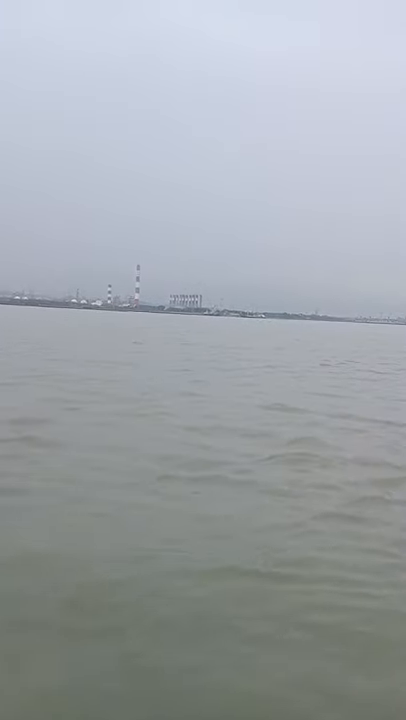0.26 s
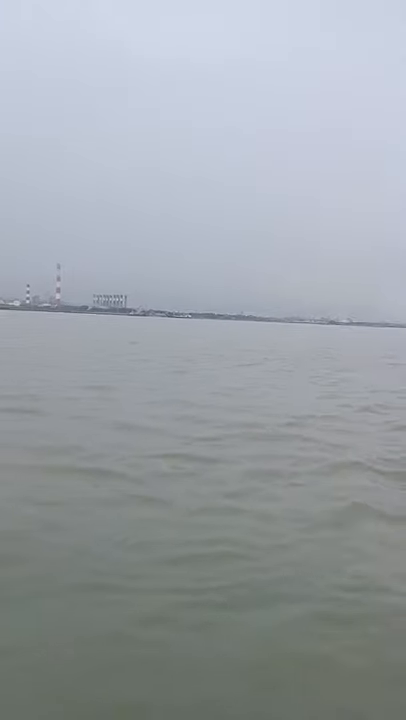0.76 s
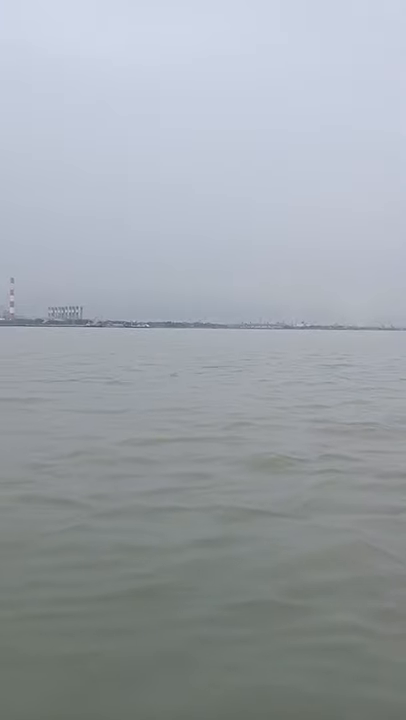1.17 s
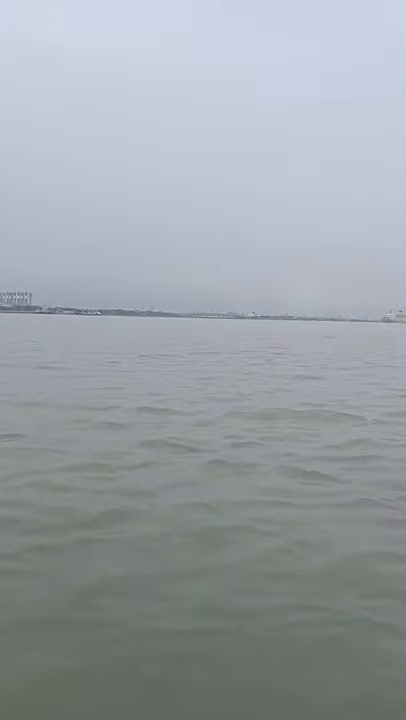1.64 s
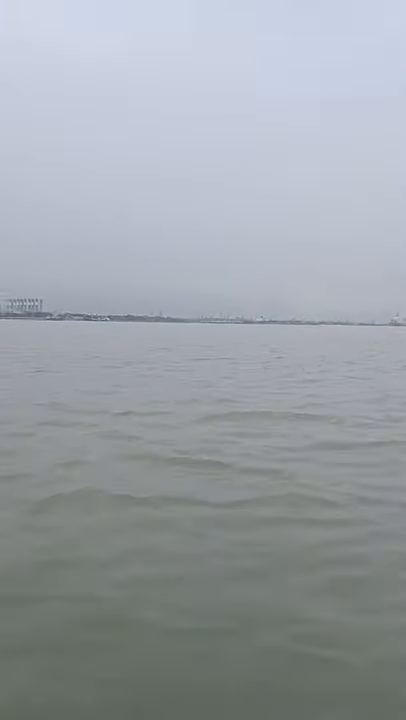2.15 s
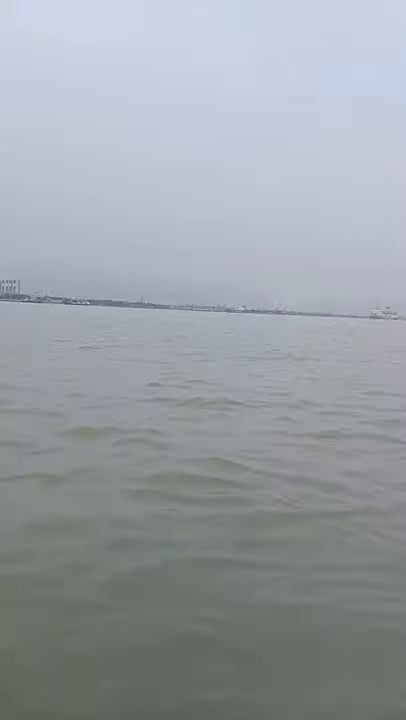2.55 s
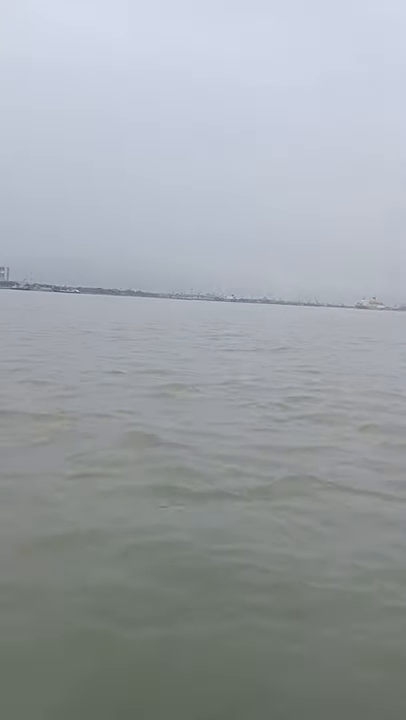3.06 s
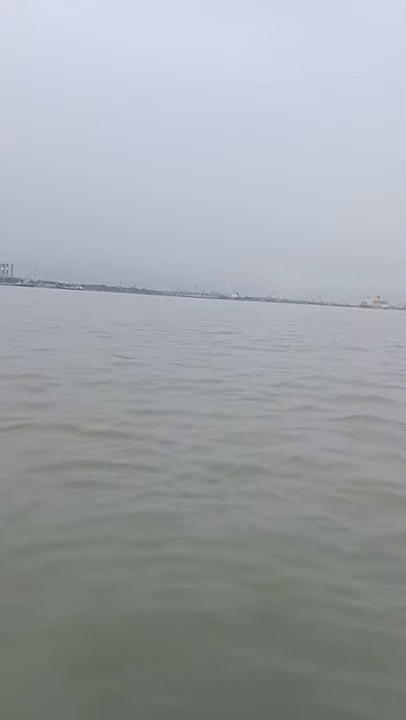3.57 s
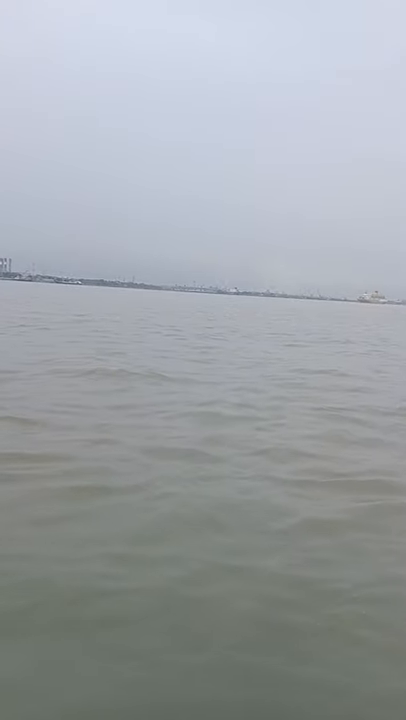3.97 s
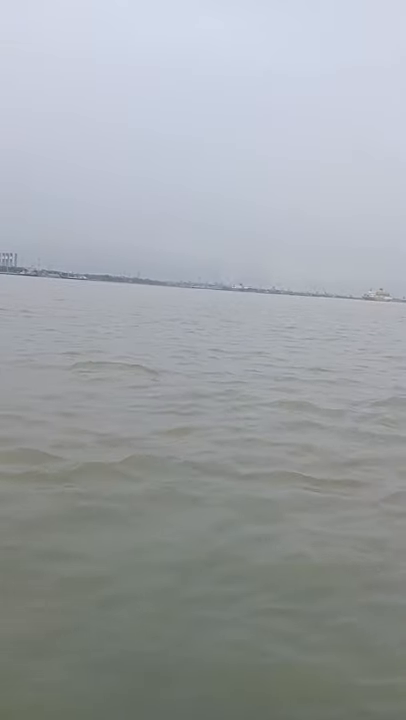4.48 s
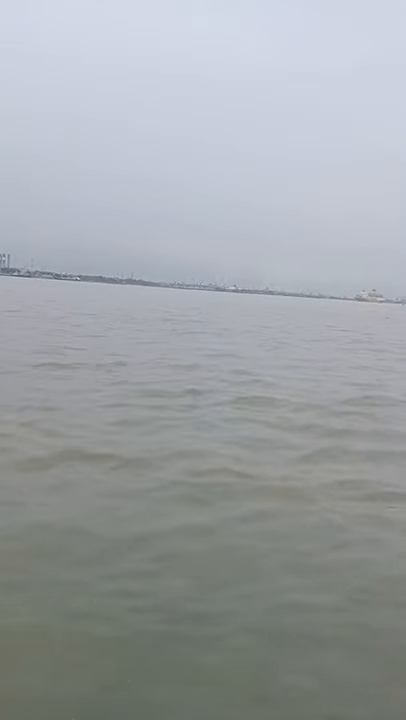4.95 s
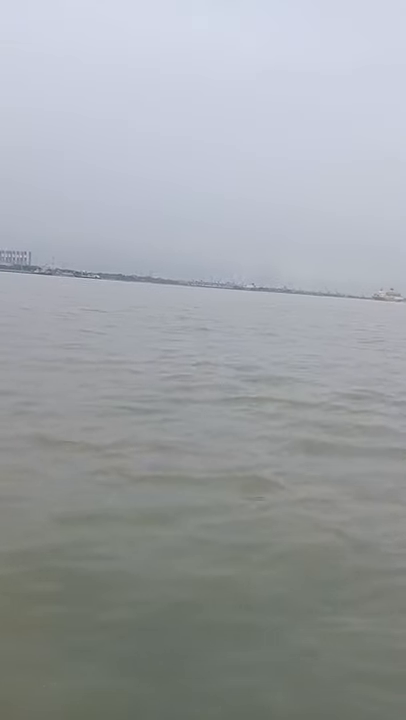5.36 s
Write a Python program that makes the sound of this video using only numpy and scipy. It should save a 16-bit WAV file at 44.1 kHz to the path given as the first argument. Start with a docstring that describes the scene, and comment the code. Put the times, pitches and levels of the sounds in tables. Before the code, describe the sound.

Deep, slowly pulsing boat engines drone on deck under constant clatter, an unsteady ringing tone and a soft hiss of water.

```python
"""A deep, slowly beating throb fills the deck of a river boat under way. It comes from a slow main
diesel and a fast generator diesel: their periodic exhaust puffs form two harmonic series, and
neighbouring harmonics beat. Engines and propeller force the hull to rumble, and impacts make the
casings clatter and the valves knock. Friction sets the propeller shaft singing unsteadily.
Behind these, gears whine, an air intake rushes and water hisses along the hull."""
import sys
import numpy as np
from scipy import signal
from scipy.fft import rfft, irfft, next_fast_len
from scipy.io import wavfile

SR = 44100
rng = np.random.default_rng(int(sys.argv[2]) if len(sys.argv) > 2 else 0)


def master_out(mix):
    """Clip the mix to full scale and print it as 16-bit PCM to the path in sys.argv[1]."""
    frames = np.transpose(np.atleast_2d(mix))
    ceiling = np.clip(frames, -1, 1)
    pcm = np.round(ceiling * 32767).astype(np.int16)
    wavfile.write(sys.argv[1], SR, pcm)


N = 247842
TIME = np.arange(N) / SR


def from_db(db):
    """Amplitude ratio of a level in decibels."""
    return 10 ** (np.asarray(db) / 20)


def unit_rms(x):
    """Normalisation to unit mean power."""
    return x / np.sqrt(np.mean(np.abs(x) ** 2) + 1e-20)


def in_time(rows):
    """Linear interpolation of (t, value) rows at every sample."""
    return np.interp(TIME, *np.transpose(rows))


def coloured(x, spectrum):
    """Spectral shaping by (f, level) rows, falling 20 dB per octave beyond their ends; rms 1."""
    hz, db = np.transpose(spectrum)
    size = next_fast_len(N)
    bins = np.maximum(np.arange(size // 2 + 1) * SR / size, 1)
    octaves_outside = np.abs(np.log2(bins / np.clip(bins, hz[0], hz[-1])))
    gain = from_db(np.interp(np.log(bins), np.log(hz), db) - 20 * octaves_outside)
    return unit_rms(irfft(rfft(x, size) * gain, size)[:N])


def noise(spectrum):
    """Filtered Gaussian noise; rms 1."""
    return coloured(rng.standard_normal(N), spectrum)


def drift(corner_hz):
    """Slow random fluctuation: low-passed noise of rms 1."""
    step, settle = 40, 2000
    pole = np.exp(-2 * np.pi * corner_hz * step / SR)
    white = rng.standard_normal(N // step + settle + 2)
    slow = signal.lfilter([1], [1, -2 * pole, pole * pole], white)[settle:]
    return np.interp(np.arange(N) / step, np.arange(len(slow)), unit_rms(slow))


def cyclic_noise(cycles):
    """Periodic excitation: one random pattern repeats on each engine cycle."""
    size = int(N / (cycles[-1] - cycles[0]))
    return rng.standard_normal(size)[(cycles % 1 * size).astype(int) % size]


def swell(start, length, edge_s):
    """Envelope from 0 to 1 with sinusoidal edges, at half height at the start and the end."""
    inside = np.minimum(TIME - start, start + length - TIME)
    return .5 + .5 * np.sin(np.pi / 2 * np.clip(inside / edge_s, -1, 1))


# Strength of the water's hiss: t/s, level/dB
WATER_LEVEL = [(0.0, -47.5), (.25, -47), (.65, -48.2), (1.15, -47.5), (1.45, -49), (2.0, -48.5), (2.7, -49),
               (4.0, -49.5), (5.6, -48.5)]
# Its spectrum: f/Hz, relative level/dB
WATER_SPECTRUM = [(2000, -8), (4200, 4.5), (4900, 0), (5600, -1), (6400, -12), (7200, -8.5), (7650, -9),
                  (8250, -7), (10000, -20), (12200, -24.5), (13600, -16.5), (15500, -22.5)]
def water_hiss():
    """Flow noise: water running along the hull radiates a broad band of treble."""
    return from_db(in_time(WATER_LEVEL)) * noise(WATER_SPECTRUM)


# Swells of the intake: onset t/s, duration/s, level/dB above the steady rush
INTAKE_SWELLS = [(2.09, 0.09, 4.5), (2.397, 0.18, 3), (3.28, .16, 2), (3.96, 0.12, 3.5), (5.36, 0.13, 6)]
# Its spectrum: f/Hz, relative level/dB
INTAKE_SPECTRUM = [(3000, -27.5), (3480, -6.5), (3620, 2.5), (3710, -0.5), (3820, -12), (4100, -31),
                   (5000, -58.5)]
def air_intake(steady_db, edge_s, waver_db):
    """Narrow-band flow noise: the rush of indrawn air wavers and now and then swells."""
    swells_db = sum(db * swell(start, length, edge_s) for start, length, db in INTAKE_SWELLS)
    return from_db(steady_db + swells_db + waver_db * drift(7.4)) * noise(INTAKE_SPECTRUM)


def whine(hz, wander, flutter_db):
    """A tone under slight random frequency and amplitude modulation; rms 1."""
    turns = np.cumsum(hz * (1 + wander * drift(1.87))) / SR + rng.random()
    return unit_rms(np.sin(2 * np.pi * turns) * from_db(flutter_db * drift(7.7)))


# Gear mesh tone, louder under load: t/s, level/dB
MESH_LEVEL = [(0.0, -39), (.45, -40.5), (.72, -33.5), (1.15, -36), (1.6, -30), (2.2, -37.5), (2.7, -34),
              (3.55, -36), (3.9, -29), (4.25, -38.5), (5.6, -38.5)]
# Gear and pump tones: f/Hz, level/dB
GEAR_AND_PUMP_TONES = [(705, -42.5), (1191, -50.5), (1585, -56), (1660, -43), (1939, -41), (2775, -44.5),
                       (2783, -46.5), (2907, -48.5), (3113, -64.5)]
def gearbox(mesh_hz):
    """Tooth meshing gives a tone that follows the load; fainter tones flutter about fixed levels."""
    mesh = from_db(in_time(MESH_LEVEL)) * whine(mesh_hz, wander=.0005, flutter_db=2.3)
    tones = (from_db(db) * whine(hz, wander=.0012, flutter_db=3.5) for hz, db in GEAR_AND_PUMP_TONES)
    return mesh + sum(tones)


# Louder valve knocks: onset t/s, relative level/dB
LOUD_KNOCKS = [(0.4794, -20), (1.9185, -16), (2.478, -17), (2.6663, -20), (2.906, -14), (3.71, -15),
               (3.7884, -11), (4.996, -16)]
# Regular valve knocks of the generator: phase/cycles, relative level/dB
VALVE_KNOCKS = [(0.296, 0), (0.973, -2)]
# Response of the valve cover to both: f/Hz, relative level/dB
COVER_SPECTRUM = [(1500, -20.5), (2300, -7.5), (2800, 5), (3000, 1.5), (3300, -14), (4200, -27)]
def valve_gear(cycles, cycle_hz, ring_s, knock_db, uneven_db):
    """Damped impacts: two bright knocks per generator cycle, and the odd louder valve knock."""
    knock_envelope, loud_knock_envelope = np.zeros((2, N))
    for phase, db in VALVE_KNOCKS:
        age = (cycles - phase) % 1 / cycle_hz / ring_s
        knock_envelope += from_db(db) * age * np.exp(-age)
    for start, db in LOUD_KNOCKS:
        age = np.maximum(TIME - start, 0) / ring_s
        loud_knock_envelope += from_db(db) * age * np.exp(-age)
    blows = rng.standard_normal(N) * knock_envelope * from_db(uneven_db * drift(3.8))
    knocks = from_db(knock_db) * coloured(blows, COVER_SPECTRUM)
    return knocks + loud_knock_envelope * noise(COVER_SPECTRUM)


def rubbed_mode(hz, width_hz, firmness):
    """A resonance driven by random rubbing, its amplitude limited by friction; rms 1."""
    pole = np.exp((-np.pi * width_hz + 2j * np.pi * hz) / SR)
    band = signal.butter(2, [.945 * hz, 1.055 * hz], "band", fs=SR, output="sos")
    rubbing = signal.sosfilt(band, rng.standard_normal(N + SR))
    swing = unit_rms(signal.lfilter([1], [1, -pole], rubbing)[SR:])
    return unit_rms(swing.real / np.sqrt(1 + firmness * np.abs(swing) ** 2))


# Surges of the shaft's note: onset t/s, duration/s, level/dB
SHAFT_SURGES = [(0.21, 0.034, -24), (0.694, 0.13, -23), (0.872, 0.034, -25), (1.125, 0.21, -21),
                (1.445, 0.034, -22), (1.525, 0.06, -24), (1.638, 0.12, -24), (1.822, 0.048, -23),
                (2.031, 0.066, -25), (2.349, 0.084, -25), (2.554, 0.29, -23), (2.999, 0.078, -24),
                (4.011, 0.058, -22), (4.137, 0.036, -23), (4.508, 0.096, -23), (4.739, 0.034, -24),
                (4.827, 0.082, -20), (5.212, 0.044, -23), (5.306, 0.148, -22), (5.506, 0.044, -25)]
def singing_shaft(hz, ringing_db, edge_s, rough, takeover):
    """Frictional vibration: the shaft rings throughout, and in surges a firmer note takes over."""
    ringing = from_db(ringing_db) * rubbed_mode(hz, width_hz=17, firmness=.2)
    tone = whine(hz, wander=.004, flutter_db=1.0)
    note = unit_rms(tone + rough * rubbed_mode(hz, width_hz=50, firmness=.6))
    return ringing + sum(swell(start, length, edge_s) * (from_db(db) * note - takeover * ringing)
                         for start, length, db in SHAFT_SURGES)


# Response of the engine casings: f/Hz, relative level/dB
CASING_SPECTRUM = [(450, -20.5), (650, -1.5), (820, -0.5), (890, 1.5), (1100, -0.5), (1280, 0.5),
                   (1550, -2), (1930, 0), (2150, -4.5), (2380, -1.5), (2550, -7), (2800, -9), (3300, -12.5),
                   (4300, -33)]
def casing_clatter(main, generator, level_db, repeat, pulsing, flutter_db):
    """Impact noise: dense metal contacts, partly periodic, pulse with the main engine's valve gear."""
    mesh_db = in_time(MESH_LEVEL)
    load_db = .12 * (mesh_db - mesh_db.mean())   # the clatter follows the load slightly
    strokes = np.cos(2 * np.pi * 36 * main) + np.cos(2 * np.pi * 38 * main)
    contacts = rng.standard_normal(N) + repeat * (cyclic_noise(main) + cyclic_noise(generator))
    excitation = contacts * (1 + pulsing * strokes) * from_db(flutter_db * drift(15))
    return from_db(level_db + load_db) * coloured(excitation, CASING_SPECTRUM)


GENERATOR_PUFF, MAIN_PUFF = .46, .917   # phase/cycles of each engine's hardest puff

# Response of the hull: f/Hz, relative level/dB
HULL_SPECTRUM = [(22, -32), (42, -22.5), (60, -12.5), (85, 2), (110, -2.5), (135, -5.5), (165, -1.3),
                 (200, -.6), (290, -7.5), (400, -7.5), (470, -3.2), (525, -8.8), (575, -11), (1200, -42.5)]
def hull_rumble(main, generator, level_db, engines_db, throb):
    """Forced vibration: random propeller churn and periodic engine shaking, throbbing once a cycle."""
    churn = rng.standard_normal(N)
    shaking = from_db(engines_db) * (cyclic_noise(main) + cyclic_noise(generator))
    pulse = 1 + throb * np.cos(2 * np.pi * (generator - GENERATOR_PUFF))
    return from_db(level_db) * coloured((churn + shaking) * pulse, HULL_SPECTRUM)


# Generator exhaust harmonics: order (multiple of the cycle rate), relative level/dB
GENERATOR_HARMONICS = [(4, -51.4), (5, -40.7), (6, -31.0), (7, -29.3), (9, -41.0), (13, -37.5), (14, -40.5),
                       (16, -40.5), (18, -36), (19, -39), (24, -41.5), (26, -42.5), (36, -34)]
def generator_exhaust(cycles, unsteady, smear):
    """Superposition: harmonics align at the hardest puff; the pipe smears the higher ones in phase."""
    angle = 2 * np.pi * (cycles - GENERATOR_PUFF)
    out = np.zeros(N)
    for order, db in GENERATOR_HARMONICS:
        lag = smear * (order / 20) ** 2 * rng.standard_normal()
        out += from_db(db) * (1 + unsteady * drift(4.8)) * np.sin(order * angle + lag)
    return np.sqrt(2) * out


# Lines beside the main firing tone: order (multiple of the cycle rate), relative level/dB
MAIN_SIDEBANDS = [(14, -46.5), (22, -44), (23, -41.5), (25, -40.5), (26, -36.5), (42, -43.5), (52, -41.5),
                  (54, -39.5), (57, -43)]
def main_exhaust(cycles, firing_order, firing_db, unsteady, smear):
    """Modulation: cylinders of unequal strength put sidebands around the firing tone."""
    angle = 2 * np.pi * (cycles - MAIN_PUFF)
    out = from_db(firing_db) * np.cos(firing_order * angle)
    for order, db in MAIN_SIDEBANDS:
        lag = smear * (order / firing_order) ** 2 * rng.standard_normal()
        out += from_db(db) * (1 + unsteady * drift(.59)) * np.cos(order * angle + lag)
    return np.sqrt(2) * out


# Gain of both exhausts, on top of their beat: t/s, relative level/dB
EXHAUST_GAIN = [(0.0, -6.5), (.35, 1.3), (1.2, -.5), (2.0, 1), (2.65, 2), (3.25, -2.2), (3.8, 0), (4.5, -1),
                (5.15, -5), (5.45, -0.5)]
def beating_exhausts(main, generator):
    """Beats: the generator's seventh harmonic lies within 1 Hz or so of the main firing tone."""
    fast = generator_exhaust(generator, unsteady=.12, smear=1.2)
    slow = main_exhaust(main, firing_order=24, firing_db=-31.5, unsteady=.22, smear=.35)
    return from_db(in_time(EXHAUST_GAIN)) * (fast + slow)


# Rate of the generator's four-stroke cycle: t/s, f/Hz
GENERATOR_RATE = [(0.0, 12.51), (0.8, 12.474), (1.6, 12.508), (2.3, 12.487), (2.9, 12.448), (3.7, 12.422),
                  (4.5, 12.453), (5.0, 12.537), (5.6, 12.473)]
def scene():
    """Superposition of engines, drive train and water at one point on deck."""
    main_hz, generator_hz = 3.6655, in_time(GENERATOR_RATE)
    main, generator = main_hz * TIME, np.cumsum(generator_hz) / SR   # elapsed engine cycles
    out = beating_exhausts(main, generator)
    out += hull_rumble(main, generator, level_db=-21.5, engines_db=-6.5, throb=.13)
    out += casing_clatter(main, generator, level_db=-25.5, repeat=.29, pulsing=.092, flutter_db=.93)
    out += valve_gear(generator, generator_hz, ring_s=.0018, knock_db=-42, uneven_db=1.5)
    out += singing_shaft(hz=1001, ringing_db=-28.3, edge_s=.012, rough=.65, takeover=.5)
    out += gearbox(mesh_hz=1452)
    out += air_intake(steady_db=-41.5, edge_s=.04, waver_db=.86)
    out += water_hiss()
    return out[None]


def record(dry):
    """Elliptic low-pass filtering cuts the treble steeply above 15.5 kHz."""
    return signal.sosfilt(signal.ellip(12, .1, 80, 15500, fs=SR, output="sos"), dry)


dry = scene()
out = record(dry)
master_out(out)
```